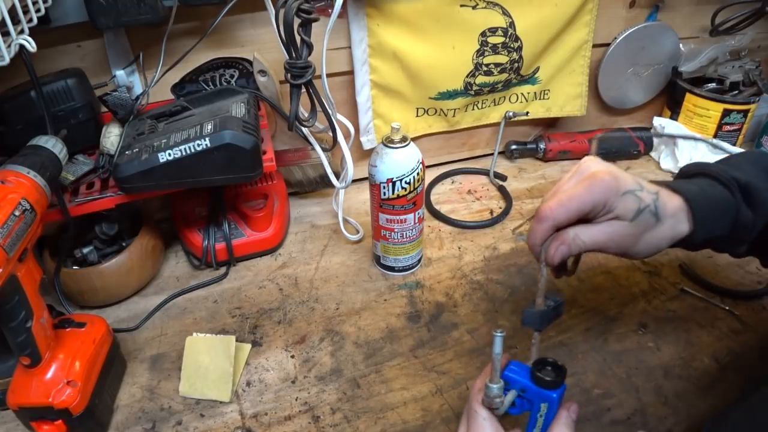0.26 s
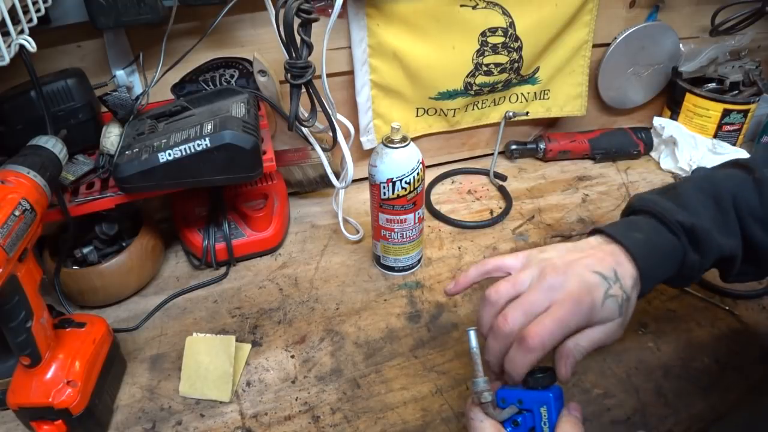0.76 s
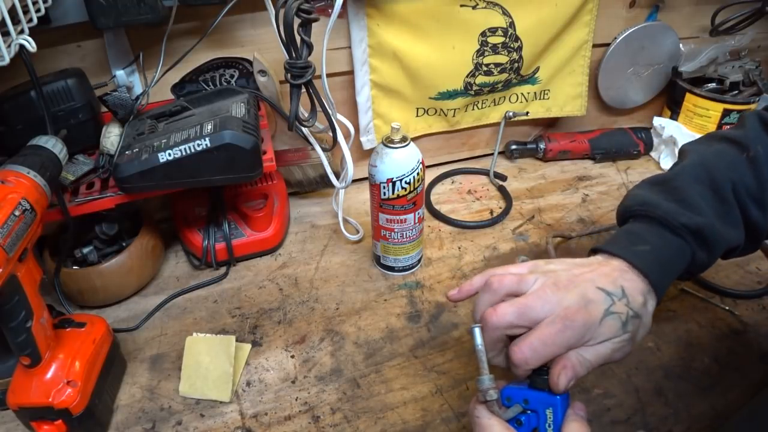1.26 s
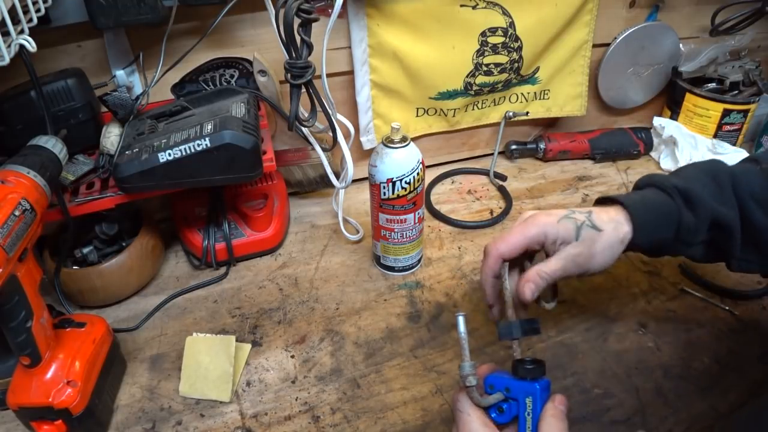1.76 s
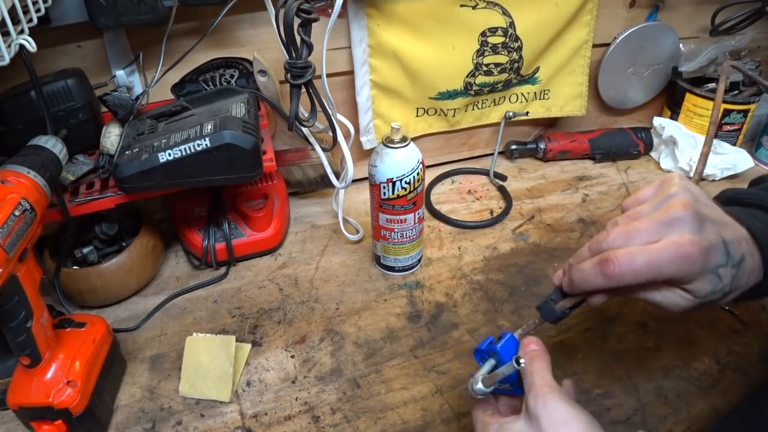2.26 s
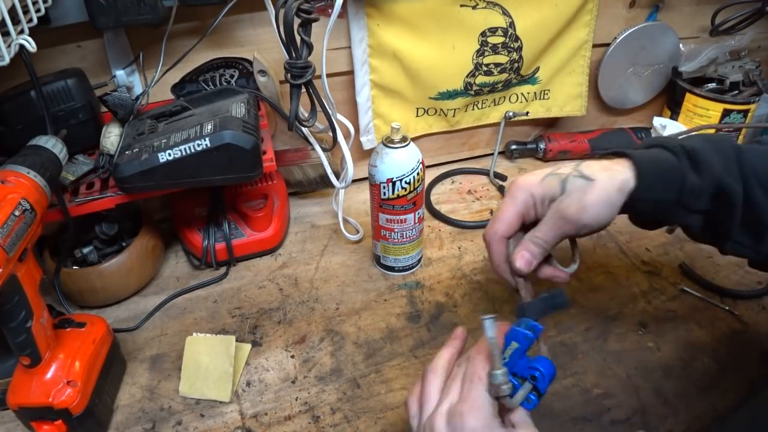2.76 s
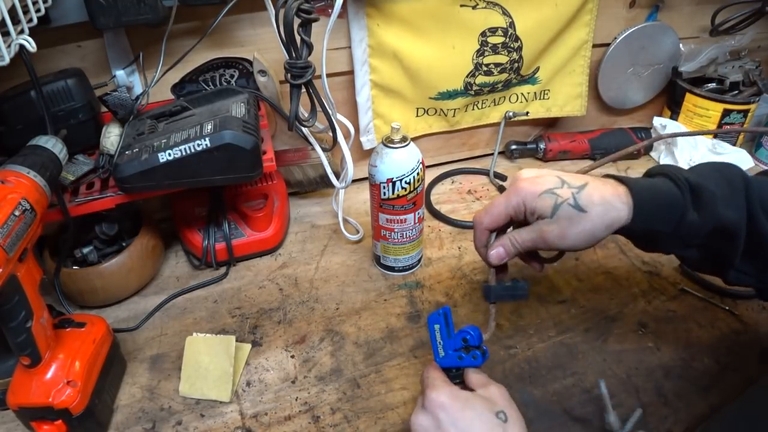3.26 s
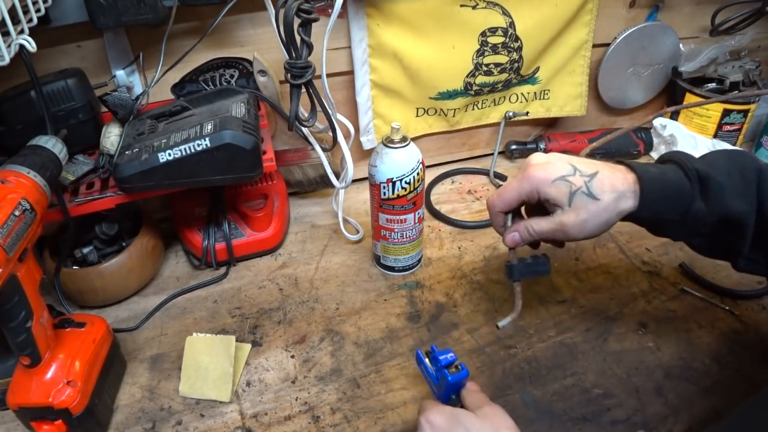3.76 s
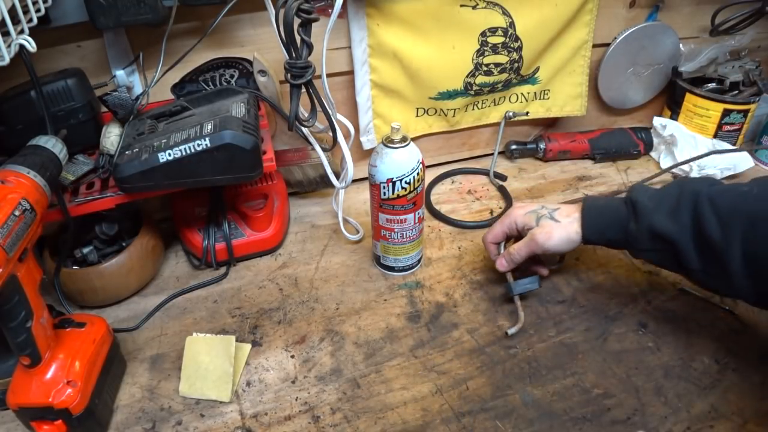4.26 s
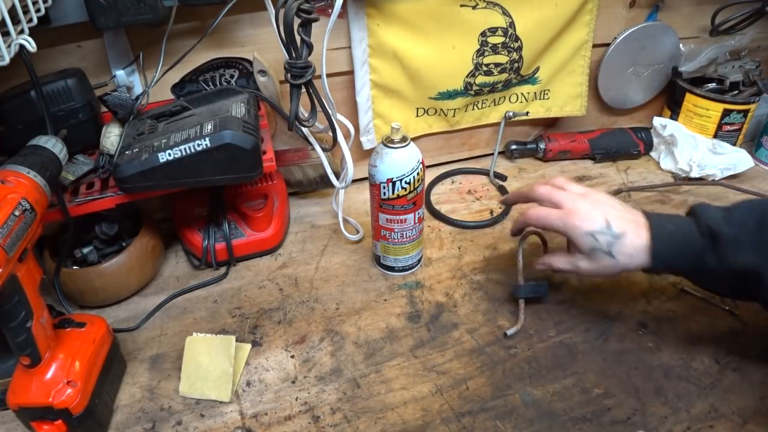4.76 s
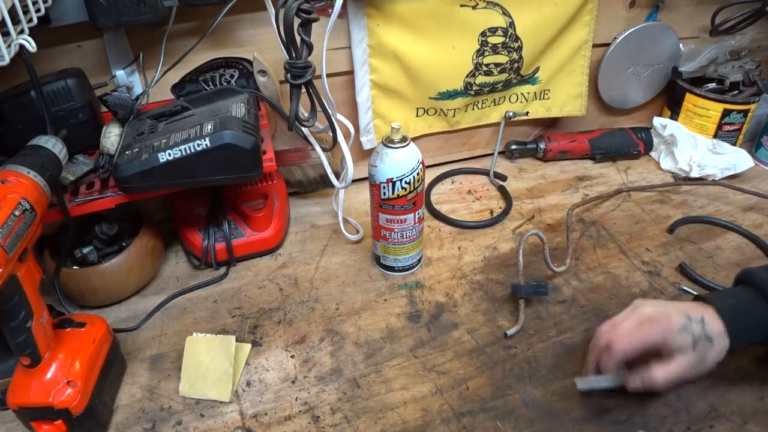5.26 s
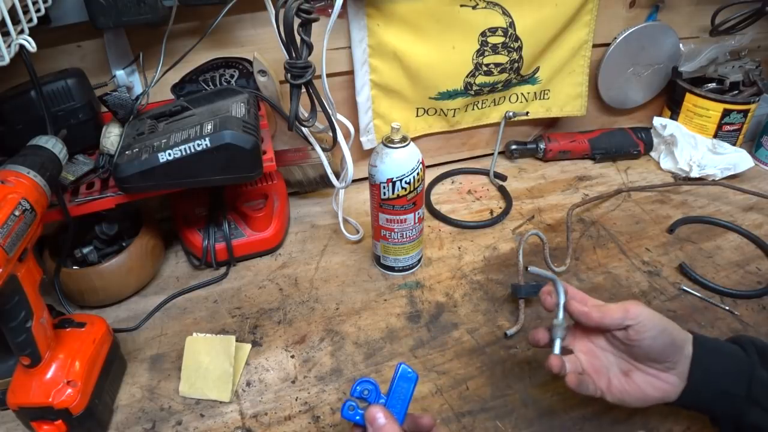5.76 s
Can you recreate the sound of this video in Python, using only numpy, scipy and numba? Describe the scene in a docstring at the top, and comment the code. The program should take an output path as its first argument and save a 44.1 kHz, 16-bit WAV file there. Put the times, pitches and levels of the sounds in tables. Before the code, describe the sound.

A bent metal tube and a small steel cutter are handled close by at a wooden workbench, over faint garage rumble and hiss. Around 0.6 seconds comes a quick cluster of sharp, hollow knocks. From 0.8 to 2 seconds the tube rubs inside the cutter in short, hollow scrapes, strongest near 1.5 and 1.9. Scattered knocks and light steel ticks follow, with a dull scuff near 2.9. A loud clack at 3.2 seconds starts a run of bright, thin clinks that thins out by 3.7. After a sharp click at 4.1, the tube knocks and scrapes on the bench around 4.3 and again near 4.8, with low wooden thumps. A brief rasp and a soft sleeve brush come just after 5 seconds, then faint clinks, a light metal slide and a last tick near 5.9. Each hit has a short room echo.

```python
"""Fingers and a sleeve brush softly over the quiet air of a garage; then a bent metal tube and a small
steel cutter scrape, knock and clink on a wooden workbench. Impacts excite the normal modes of tube,
steel and bench, and stick-slip friction drives the same bodies between the blows. The room answers
with a short reverberant tail, and a limiter lowers the level after the loudest blows."""
import sys
import numpy as np
from scipy import signal
from scipy.fft import rfft, irfft
from scipy.io import wavfile
from scipy.ndimage import uniform_filter1d
from numba import njit

SR = 44100
rng = np.random.default_rng(int(sys.argv[2]) if len(sys.argv) > 2 else 0)


def materialize(psi):
    """Save the field psi as 16-bit PCM at rate SR to the path in sys.argv[1].

    A 1-D psi becomes a single channel; in a 2-D psi each row is a channel.
    """
    bounded = np.clip(np.atleast_2d(psi).T, -1, 1)
    quanta = np.round(bounded * 32767).astype(np.int16)
    wavfile.write(sys.argv[1], SR, quanta)


N = 264864

# Spectrum of the background. Each row: frequency in Hz, relative spectral density in dB.
AIR_SPECTRUM = [(15, -50), (25, -9), (48, 8), (70, -1.5), (82, 8), (161, -4.5), (195, 3), (301, -2),
                (1400, -10.5), (1890, -12.5), (2410, -13.5), (4030, -14), (5140, -16), (8360, -15.5),
                (16000, -26.5)]
# Strokes of fingers and sleeve. Each row: peak time in seconds, length in seconds, level in dB.
BRUSH_STROKES = [(0.018, 0.076, -50), (0.114, 0.1, -46), (1.214, .015, -42), (1.252, 0.066, -39),
                 (1.324, .1, -48.5), (1.5, 0.07, -48), (1.798, 0.026, -45), (1.883, 0.19, -44),
                 (2.13, 0.16, -40.5), (2.349, 0.0063, -43), (2.564, 0.034, -32), (5.067, 0.044, -39),
                 (5.125, 0.07, -35.5), (5.32, 0.15, -48), (5.504, 0.24, -48.5), (5.926, 0.094, -43)]
# Scuffs of tube, cutter and hands. Each row: peak time in seconds, length in seconds,
# then the levels of tube rub, steel rasp and bench drone in dB.
SCUFF_STROKES = [(0.406, 0.39, -50, -48, -60), (0.818, 0.058, -23, -58, -31),
                 (0.902, 0.038, -14.5, -36, -21), (1.074, 0.061, -28.5, -46, -34),
                 (1.255, 0.12, -36, -44, -25), (1.469, .15, -27, -39.5, -33),
                 (1.505, 0.048, -9, -25.5, -30), (1.566, 0.026, -19, -52, -23),
                 (1.693, 0.17, -29, -45, -25.5), (1.852, 0.078, -13, -27.5, -41),
                 (1.9, 0.042, -14, -27.5, -39), (2.171, 0.07, -28.5, -32.5, -24),
                 (2.469, 0.071, -54, -36, -73), (2.563, 0.013, -59, -27, -61),
                 (2.624, 0.028, -49, -29, -59), (2.917, 0.04, -17.5, -57, -11),
                 (3.171, 0.032, -41, -29, -38), (3.306, 0.096, -15, -45, -45), (3.512, 0.16, -33, -45, -33),
                 (4.051, 0.18, -42.5, -43.5, -53), (4.319, 0.095, -12.5, -40, -38),
                 (4.543, 0.046, -33.5, -47, -30), (4.679, 0.046, -31, -38, -44),
                 (4.714, 0.04, -24.5, -29.5, -31), (4.835, 0.064, -13, -60, -37),
                 (5.069, 0.025, -19, -16, -41), (5.136, 0.043, -25.5, -28.5, -53),
                 (5.478, 0.52, -63, -51.5, -63), (5.9, 0.55, -49, -44, -49)]
# The cutter sliding on steel. Each row: peak time in seconds, length in seconds, level in dB.
SLIDE_STROKES = [(5.761, 0.024, -40), (5.847, 0.19, -37.5)]
# Normal modes of the tube, the metal (cutter and cut-off piece, plus long tube rings at 870 and 1520 Hz) and
# the bench top. Each row: frequency in Hz, relative level in dB, time to decay by 60 dB in seconds.
TUBE_MODES = [(330, -10, .03), (400, -7, .035), (470, -4, .035), (560, -4, .035), (640, -2, .045),
              (700, 0, .05), (770, -1, .045), (870, -2, .045), (1005, -2, .045), (1120, -1, .05),
              (1340, -1, .045), (1520, -2, .05), (1990, -5, .04)]
METAL_MODES = [(870, 0, .2), (1520, 0, .25), (1750, 0, .05), (2420, -12, .04), (2700, -16, .04),
               (3100, -16, .045), (3600, -16, .09), (4250, -16, .03), (4550, -15, .05), (5480, -20, .05),
               (6300, -5, .08), (7150, -4, .035), (8200, -14, .025), (9270, -22, .05), (10100, -22, .2),
               (11650, -24, .08), (13100, -18, .05), (13620, -5, .11), (13760, -7, .14)]
BENCH_MODES = [(82.04, -5.5, 0.78), (173.6, 7, 0.085), (266, -6.5, 0.24)]
# Blows of the tube on bench and cutter. Each row: start in seconds, relative levels of tube knock,
# crack and bench thump in dB, favoured tube frequency in Hz, relative share sent to the room in dB.
TUBE_BLOWS = [(0.4493, -21.5, -3, -46, 736, 3), (0.5649, -0.5, -2, -45, 825, -4),
              (0.5767, -11.5, -8, -2, 760, 6), (0.597, 11, 16.5, -36, 1070, -7),
              (0.647, 2.5, 9.5, 1, 750, -1), (0.6785, -7.5, -25, -7, 690, -9),
              (0.6944, -3.5, -29, -6, 880, 0), (1.163, -8, -35, -8, 630, -7),
              (1.229, -7.5, -51, -11, 545, -6), (2.0961, -3.5, -8.5, -40, 730, -9),
              (2.1074, -8, -10, -45, 725, -1), (2.6529, 1.6, -13, -3.5, 462, -7.5),
              (2.8869, -0.5, 1.5, 0.5, 920, -10), (3.2045, 11.5, 19, -0.5, 1150, 2.5),
              (3.248, 7.5, 2, -32, 1430, -1.5), (3.3605, -10, -10.5, -41, 795, -0.5),
              (3.3909, -8.5, -4.5, -29, 650, 2), (3.4583, -5.5, -2, -18, 1240, -8.5),
              (3.5052, -10.5, -10.5, -23, 1050, -2), (4.2855, 7.5, 11, 3, 603, -7.5),
              (4.3309, 0.5, -15, -3.5, 624, 0), (4.367, 3, 7.5, -50, 970, -3.5),
              (4.7406, -0.5, 8, -3.5, 784, -1), (4.771, -0.5, -2.5, -30, 1170, 1.5),
              (4.823, -8.5, -11, -7, 810, 7), (5.025, -9, -12.5, -11.5, 400, -1),
              (5.191, -13, -13.5, -40, 1220, 2), (5.2242, -21.5, -13.5, -48, 1430, -3.5)]
# Clear ringing notes of clinking metal, one row per note; a contact may sound several.
# Each row: start in seconds, frequency in Hz, level in dB.
CLINK_NOTES = [(0.902, 1520, -30), (1.164, 870, -15.5), (2.381, 3600, -23), (2.86, 7150, -17),
               (3.045, 13620, -43), (3.205, 13620, -14), (3.248, 13620, -18.5), (3.392, 6300, -38),
               (3.392, 13620, -44), (3.459, 10100, -42), (3.458, 7150, -16), (3.569, 8200, -26.5),
               (3.417, 13620, -20), (3.42, 2420, -12), (3.458, 13620, -13.5), (3.522, 13620, -29),
               (3.522, 11650, -30), (3.523, 8200, -13.5), (3.522, 4250, -17), (3.633, 7150, -33),
               (2.38, 7150, -28), (3.933, 3100, -23), (4.097, 13760, -25), (4.098, 10100, -39),
               (4.773, 3600, -15), (5.617, 7150, -19), (5.636, 3100, -28)]
# Light taps of steel on steel. Each row: start in seconds, relative levels of crack and bright tick
# in dB, relative share sent to the room in dB.
STEEL_TAPS = [(2.0369, -13.5, -45, -0.5), (2.3794, -15, -5, -1.5), (2.5348, -25.5, -25, 7),
              (2.7913, -9.5, -0.5, -2), (2.848, -9, -3, -13), (2.8567, -12.5, 10.5, -1),
              (2.997, -24.5, -15.5, 3), (3.0183, -31, -24, -4), (3.0437, -21, -3, 2.5),
              (3.083, -22.5, -41, -14), (3.4163, -10, 6.5, 5), (3.519, -30, 5, 1), (3.548, -23, -30, 7),
              (3.5636, -18, -5.5, -9), (3.6334, -36, -33, -10), (3.665, -27, -48, 4.5),
              (3.7883, -30.5, -38, 2), (3.917, -25.5, -35, 2), (3.933, -27, -13.5, -5),
              (4.0976, 5.5, 3, -2), (4.117, -2, -22, -2), (5.6167, -34, -1, 1.5), (5.636, -34, -39, -2),
              (5.901, -18, 12, -0.5)]
# Reverberation of the garage. Each row: band centre in Hz, relative level in dB,
# time to decay by 60 dB in seconds.
ROOM_BANDS = [(132.5, -2, 0.41), (400, 1.5, 0.29), (1250, 0, 0.28), (2200, -5, 0.38), (3930, -11, 0.37),
              (5770, -11, 0.36), (9900, -7.5, 0.12)]


def undb(db):
    """Amplitude grows tenfold for every 20 dB."""
    return 10 ** (np.asarray(db) / 20)


def band(x, lo_hz, hi_hz, order=2):
    """A Butterworth band-pass attenuates what lies outside its two edges."""
    edges_hz = [lo_hz, min(hi_hz, .45 * SR)]
    return signal.sosfilt(signal.butter(order, edges_hz, "band", fs=SR, output="sos"), x)


def unit(x):
    """Division by the rms gives a signal unit power."""
    return x / np.sqrt(np.mean(x ** 2))


def ring(drive, modes):
    """Modal superposition: a driven body responds as a sum of damped resonators."""
    out = 0
    for hz, db, t60 in modes:
        r, w = np.exp(-np.log(1000) / (t60 * SR)), 2 * np.pi * hz / SR
        out = out + undb(db) * signal.lfilter([0, np.sin(w)], [1, -2 * r * np.cos(w), r * r], drive)
    return out


def waver(rate_hz):
    """Random modulation: straight ramps join random values, scaled to unit rms."""
    hold = int(SR / rate_hz)
    steps = np.repeat(rng.standard_normal(N // hold + 1), hold)
    return unit(uniform_filter1d(steps, hold)[:N])


def swell(peak_s, length_s, rise_share=.43):
    """Contact pressure rises and falls in a skewed bell over one stroke."""
    t = np.arange(0, N, 16) / SR
    width_s = length_s * np.where(t < peak_s, rise_share, 1 - rise_share)
    bell = np.exp(-2 * ((t - peak_s) / width_s) ** 2)
    return np.repeat(bell, 16)[:N]


def room_air(level_db=-45):
    """Background noise: a broad spectrum of low rumble and faint hiss wavers a little in level."""
    hz, db = np.transpose(AIR_SPECTRUM)
    bin_hz = np.maximum(np.arange(N // 2 + 1) * SR / N, 1)
    colour = undb(np.interp(np.log(bin_hz), np.log(hz), db))
    noise = irfft(rfft(rng.standard_normal(N)) * colour, N)
    return undb(level_db + 1.5 * waver(6)) * unit(noise)


def brushing():
    """Sliding friction of skin and cloth radiates a soft treble noise."""
    pressure = sum(undb(db) * swell(s, length) for s, length, db in BRUSH_STROKES)
    noise = rng.standard_normal(N) * undb(2.3 * waver(150))
    hiss = unit(band(noise, 6600, 9100, order=1)) + .5 * unit(band(noise, 12000, 14700, order=1))
    return pressure * hiss


def rubbing(slips_per_s=3000, seated_until_s=2.3, rasp_t60_s=.045, slide_t60_s=.035):
    """Stick-slip friction: dense random impulses drive tube, steel and bench during each stroke."""
    slips = (rng.random(N) < slips_per_s / SR) * rng.standard_normal(N)
    slips = unit(slips) * undb(3 * waver(120))
    tube = unit(ring(slips, TUBE_MODES)) + .86 * unit(band(slips, 373, 1050))
    seated = unit(band(tube, 590, 890) + .66 * tube)  # the tube inside the hollow of the cutter
    tube = np.where(np.arange(N) < seated_until_s * SR, seated, tube)
    # Rubbing damps the steel; the modes of the rasp weaken by 7 dB per octave.
    rasp_modes = [(hz, -7 * np.log2(hz / 1500), rasp_t60_s) for hz, _, _ in METAL_MODES[1:]]
    rasp = unit(band(slips, 620, 2460)) + .45 * unit(ring(slips, rasp_modes))
    drone = unit(band(ring(slips, BENCH_MODES), 92, 282)) + .59 * unit(band(slips, 293, 516))
    slide = unit(ring(slips, [(hz, db, slide_t60_s) for hz, db, _ in METAL_MODES[2:]]))
    tube_gain, rasp_gain, drone_gain = sum(
        np.outer(undb(db), swell(s, length)) for s, length, *db in SCUFF_STROKES)
    slide_gain = sum(undb(db) * swell(s, length) for s, length, db in SLIDE_STROKES)
    return tube_gain * tube + rasp_gain * rasp + drone_gain * drone + slide_gain * slide


def contact_forces(count, samples, chatter_s, roughness):
    """Each contact force is an impulse followed by decaying chatter, scaled to unit energy."""
    t = np.arange(samples) / SR
    force = np.exp(-t / chatter_s) * (roughness * rng.standard_normal((count, samples)) + (t == 0))
    return force / np.linalg.norm(force, axis=1, keepdims=True)


def place(starts_s, sounds):
    """Linear superposition: sounds add, each from its own start."""
    out = np.zeros(N + sounds.shape[1])
    for start_s, sound in zip(starts_s, sounds):
        i = int(start_s * SR)
        out[i:i + sound.size] += sound
    return out[:N]


def blows(starts_s, db, chatter_s, roughness):
    """Impulsive excitation: a train of brief contact forces has a broad spectrum."""
    forces = contact_forces(len(starts_s), 1024, chatter_s, roughness)
    return place(starts_s, undb(db)[:, None] * forces)


def tube_knocks(starts_s, db, favoured_hz, detune=.025, scatter_db=2.5):
    """Grip and point of impact retune and reweight the tube's modes, favouring those near one pitch."""
    t = np.arange(4096) / SR
    hz, mode_db, t60 = np.transpose(TUBE_MODES)[:, None, :, None]  # axes: knock, mode, time
    octaves_away = np.abs(np.log2(hz / favoured_hz[:, None, None]))
    grip = rng.standard_normal((len(starts_s), 2, len(TUBE_MODES), 1))
    onset_db = db[:, None, None] + mode_db - 16 * octaves_away + scatter_db * grip[:, 0]
    tuned_hz = hz * (1 + detune * grip[:, 1])
    response = np.sum(undb(onset_db - 60 * t / t60) * np.sin(2 * np.pi * tuned_hz * t), axis=1)
    forces = contact_forces(len(starts_s), t.size, chatter_s=.006, roughness=.14)
    return place(starts_s, signal.fftconvolve(response, forces, axes=1))


def contacts():
    """Blows and taps excite the same bodies; levels that their tables omit follow the crack."""
    starts_s, tube_db, crack_db, bench_db, tube_hz, room_db = np.transpose(TUBE_BLOWS)
    heavy = [starts_s, crack_db, crack_db - 4.5, bench_db, tube_db, tube_hz, room_db]
    starts_s, crack_db, tick_db, room_db = np.transpose(STEEL_TAPS)
    tube_hz = np.full_like(starts_s, 1260)
    light = [starts_s, crack_db, tick_db, crack_db - 29, crack_db - 13, tube_hz, room_db]
    return np.hstack([heavy, light])


def impacts():
    """Impact radiates a crack and rings bench and tube; returns the direct sound and the room's feed."""
    starts_s, crack_db, tick_db, bench_db, tube_db, tube_hz, room_db = contacts()

    def radiate(share_db, crack_s, tick_s, crack_top_hz, tick_gain_db):
        """Contact noise and modal ringing add along one path."""
        crack = band(blows(starts_s, crack_db + share_db, crack_s, roughness=1), 840, crack_top_hz)
        tick = band(blows(starts_s, tick_db + share_db, tick_s, roughness=.63), 6000, 8200, order=1)
        sheen = band(blows(starts_s, tick_db + share_db, tick_s, roughness=.9), 12500, 15500, order=1)
        bench_force = blows(starts_s, bench_db + share_db, chatter_s=.0036, roughness=.38)
        thump = band(ring(bench_force, BENCH_MODES), 68, 236)
        knock = band(tube_knocks(starts_s, tube_db + share_db, tube_hz), 313, 1990)
        treble = undb(tick_gain_db) * (tick + undb(-15) * sheen)
        return undb(27.5) * crack + treble + undb(-11) * thump + undb(1.5) * knock

    direct = radiate(0, crack_s=.0047, tick_s=.0044, crack_top_hz=3000, tick_gain_db=9.9)
    # The room is fed a very short crack, so its tail sounds smooth and even.
    room_feed = radiate(room_db, crack_s=.0003, tick_s=.0003, crack_top_hz=3520, tick_gain_db=11)
    return direct, room_feed


def clinks(chatter_s=.004, roughness=.15, waver_db=3.5):
    """Free vibration: each note is a metal mode ringing after a contact, which may sound several."""
    t = np.arange(2048) / SR
    noise = rng.standard_normal((len(CLINK_NOTES), t.size))
    forces = (t == 0) + roughness * np.exp(-t / chatter_s) * noise
    mode_hz, mode_db, _ = np.transpose(METAL_MODES)
    drives = np.zeros((len(METAL_MODES), N))
    for (start_s, hz, db), force in zip(CLINK_NOTES, forces):
        nearest = np.argmin(np.abs(mode_hz - hz))
        i = int(start_s * SR)
        drives[nearest, i:i + t.size] += undb(db - mode_db[nearest]) * force
    # The piece turns and rattles as it rings, so every note wavers.
    return sum(ring(drive, [mode]) * undb(waver_db * waver(200))
               for drive, mode in zip(drives, METAL_MODES) if drive.any())


def garage(x, build_up_s=.0017):
    """Reverberation: a diffuse field builds up, then decays exponentially at each band's own rate."""
    t = np.arange(SR // 2) / SR
    tail = sum(undb(db - 60 * t / t60) * band(rng.standard_normal(t.size), hz / 1.585, hz * 1.526)
               for hz, db, t60 in ROOM_BANDS)
    tail *= np.clip(t / build_up_s, 0, 1) ** 2
    return signal.fftconvolve(x, tail)[:N]


@njit
def compress(x, threshold, ratio, attack_s, release_s):
    """Compression: gain falls as the envelope exceeds a threshold and recovers more slowly."""
    out, envelope = np.empty(len(x)), 1e-9
    for i in range(len(x)):
        lag_s = attack_s if abs(x[i]) > envelope else release_s
        envelope += (abs(x[i]) - envelope) / (lag_s * SR)
        out[i] = x[i] * min(1., threshold / envelope) ** (1 - 1 / ratio)
    return out


def scene():
    """Direct sound, reverberation and background noise superpose at the listener."""
    direct, room_feed = impacts()
    friction = rubbing() + brushing()
    notes = clinks()
    echo = garage(undb(-31) * room_feed + undb(-35) * friction + undb(-47) * notes)
    return (direct + friction + notes + echo + room_air())[None]


def record(dry):
    """Gentle compression and a lagging limiter narrow the dynamics; peaks clip, bass and top are cut."""
    x = compress(dry[0], undb(-19.5), ratio=1.107, attack_s=.051, release_s=.25)
    x = compress(x, undb(-10.5), ratio=5.9, attack_s=.0038, release_s=.021)
    bass_cut = signal.butter(2, 55, "high", fs=SR, output="sos")
    top_cut = signal.ellip(8, .2, 70, 15750, fs=SR, output="sos")
    x = signal.sosfilt(bass_cut, np.clip(x, -1, 1))
    return signal.sosfilt(top_cut, x)[None]


dry = scene()
out = record(dry)
materialize(out)
```